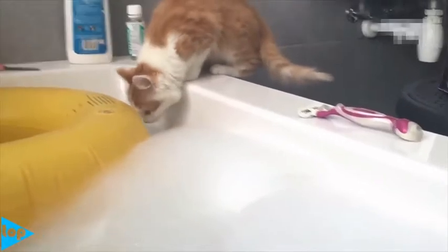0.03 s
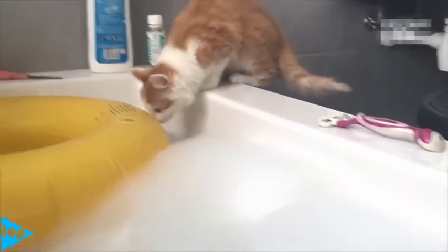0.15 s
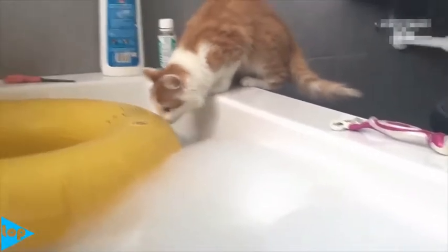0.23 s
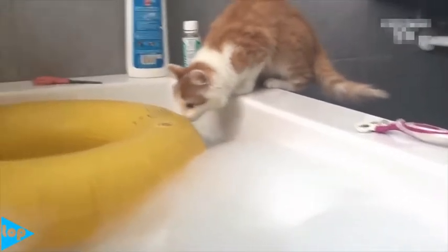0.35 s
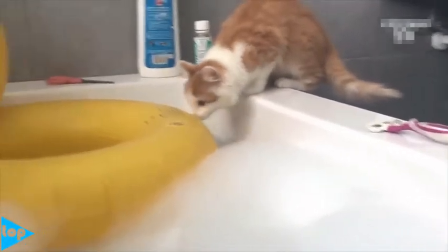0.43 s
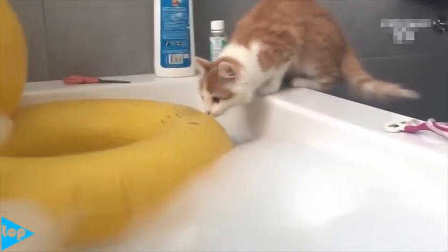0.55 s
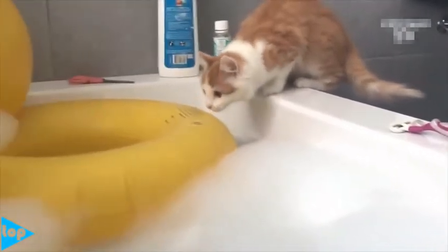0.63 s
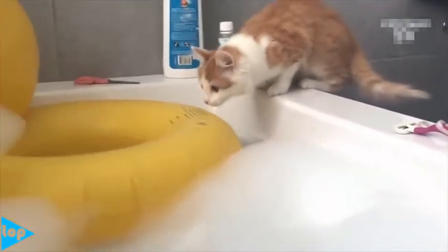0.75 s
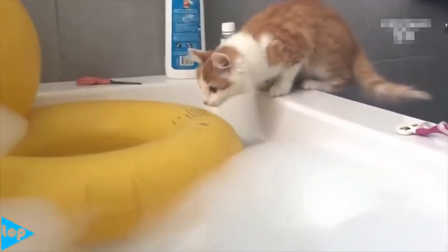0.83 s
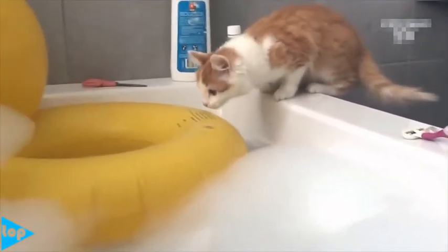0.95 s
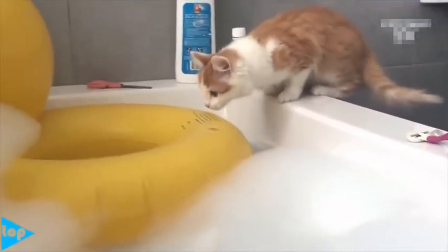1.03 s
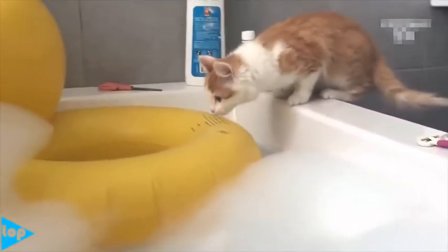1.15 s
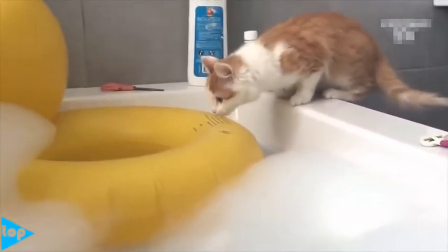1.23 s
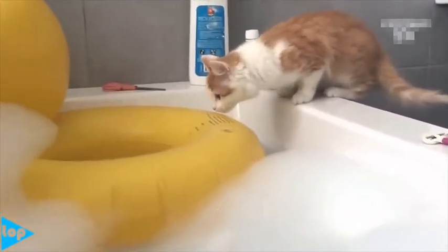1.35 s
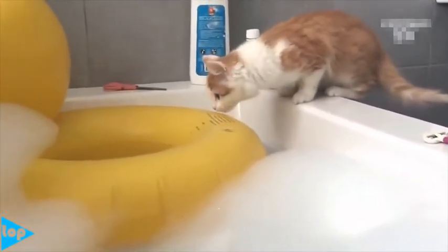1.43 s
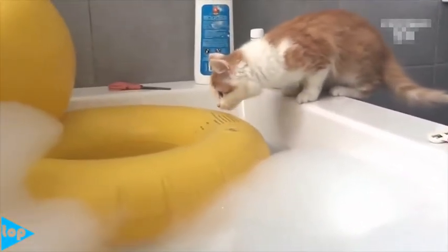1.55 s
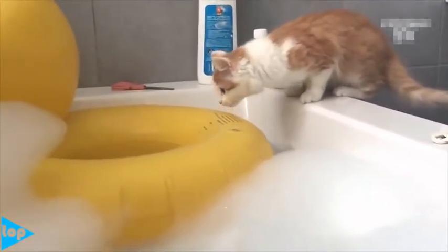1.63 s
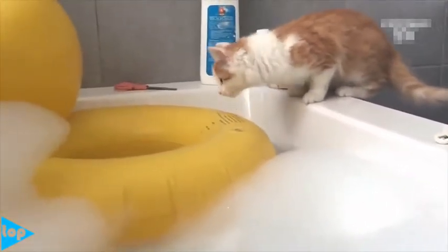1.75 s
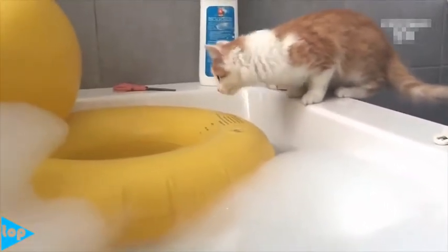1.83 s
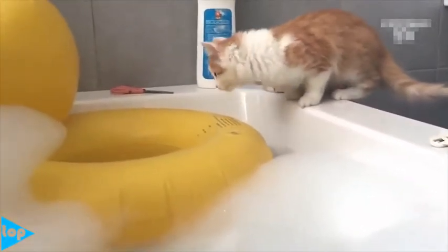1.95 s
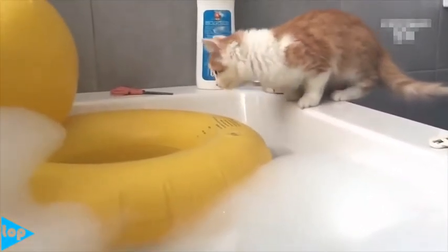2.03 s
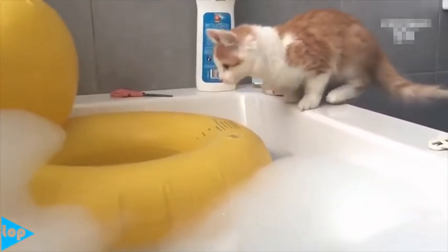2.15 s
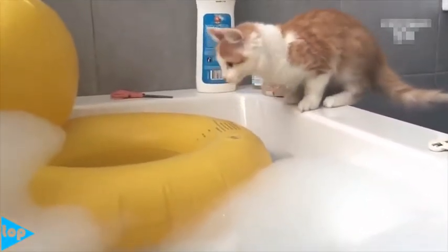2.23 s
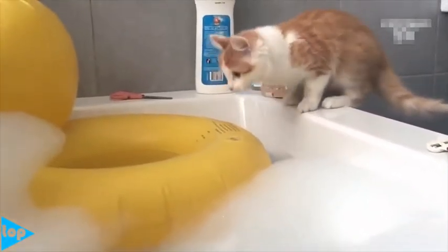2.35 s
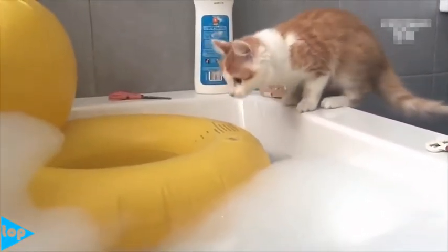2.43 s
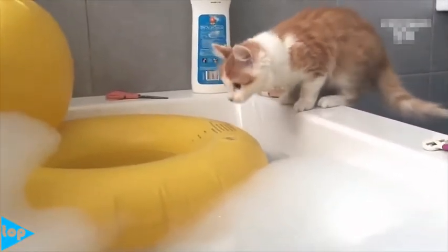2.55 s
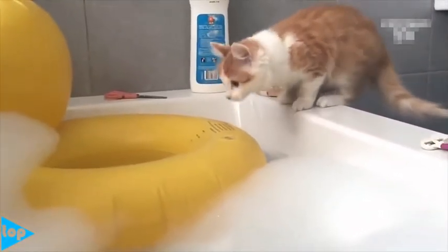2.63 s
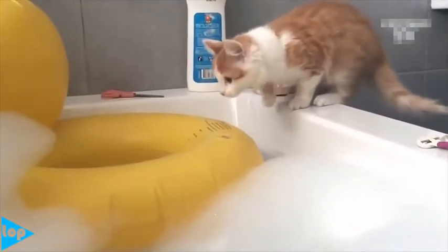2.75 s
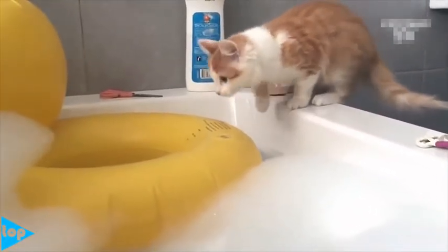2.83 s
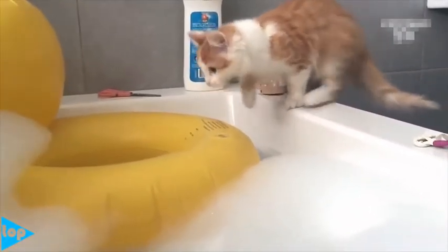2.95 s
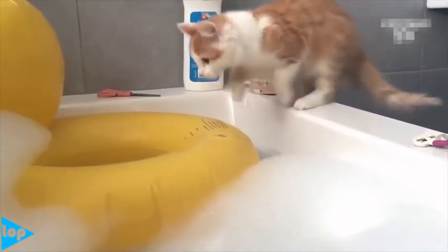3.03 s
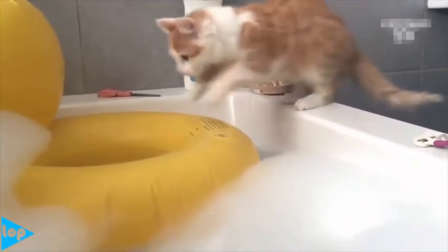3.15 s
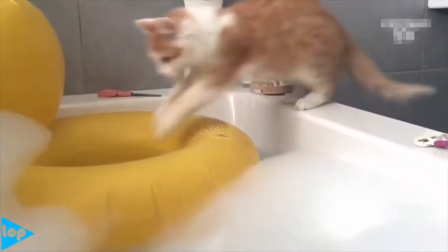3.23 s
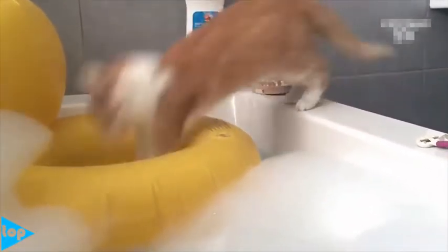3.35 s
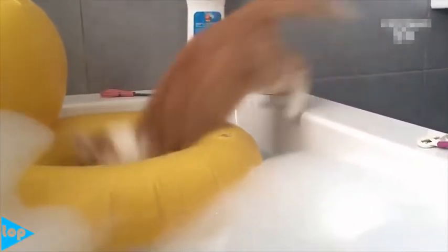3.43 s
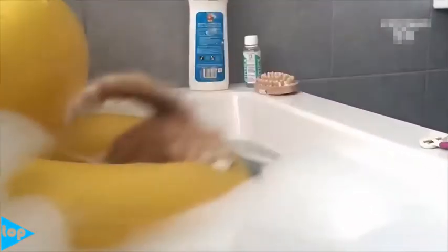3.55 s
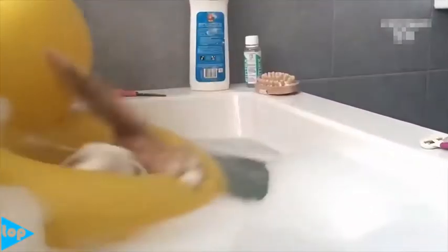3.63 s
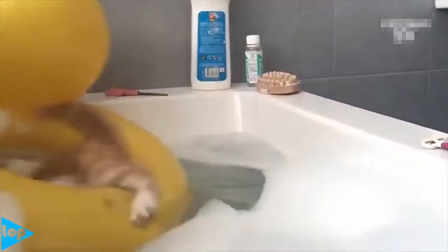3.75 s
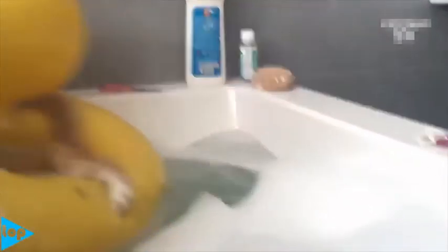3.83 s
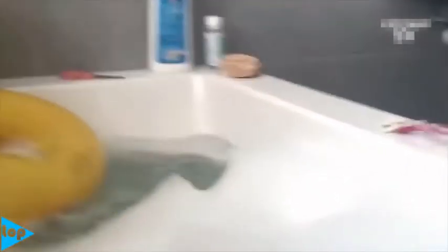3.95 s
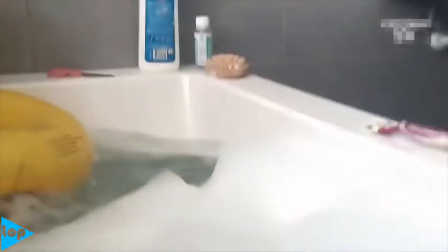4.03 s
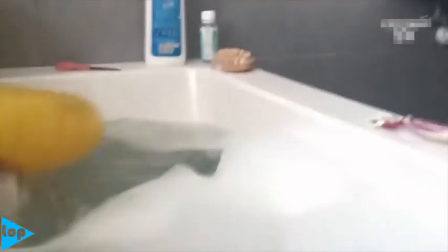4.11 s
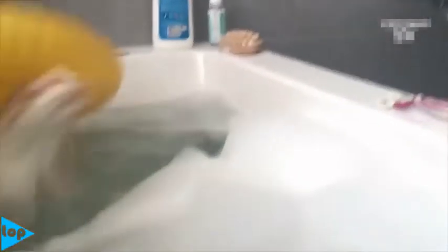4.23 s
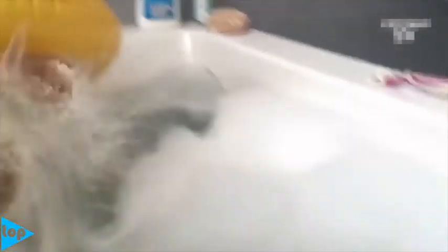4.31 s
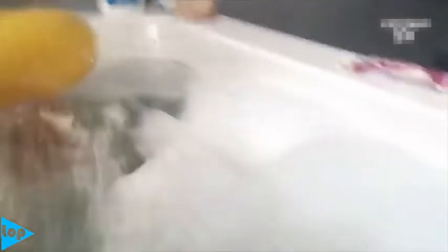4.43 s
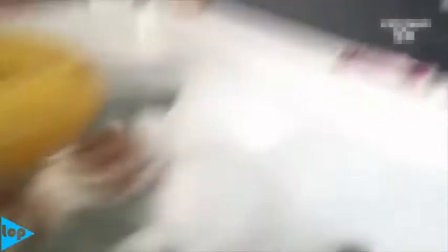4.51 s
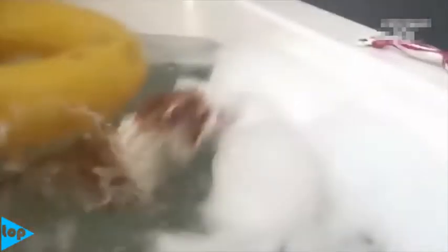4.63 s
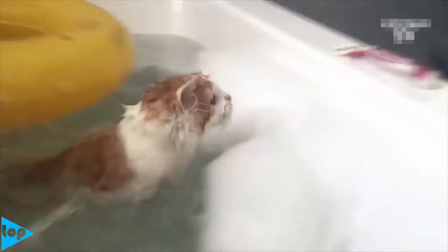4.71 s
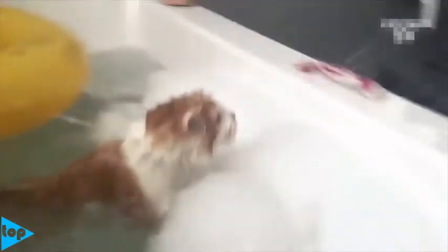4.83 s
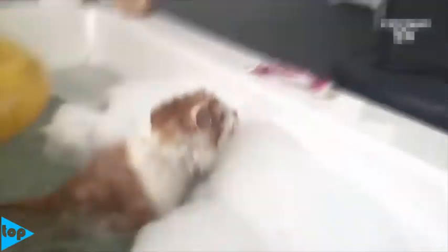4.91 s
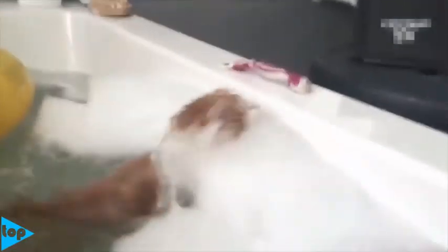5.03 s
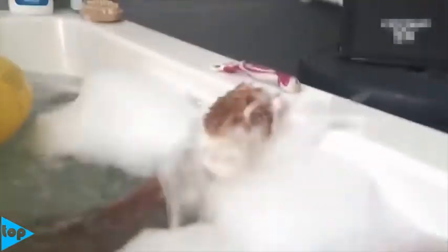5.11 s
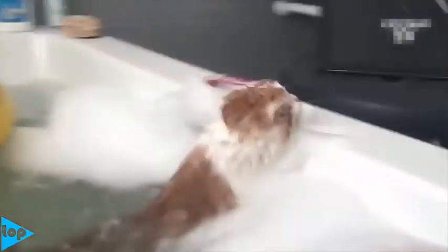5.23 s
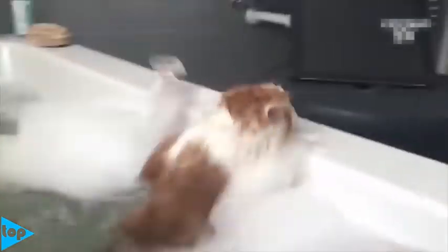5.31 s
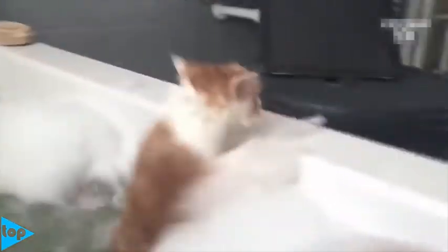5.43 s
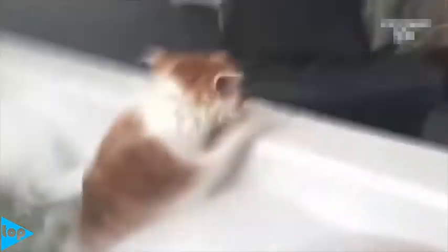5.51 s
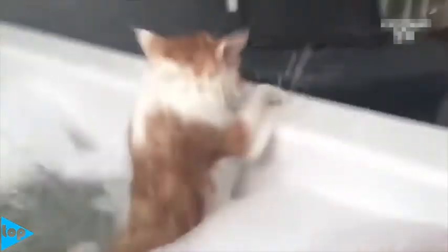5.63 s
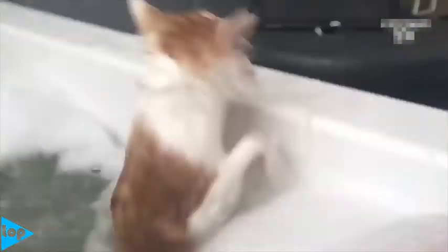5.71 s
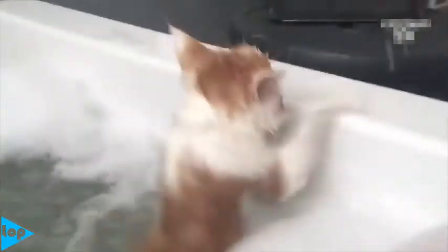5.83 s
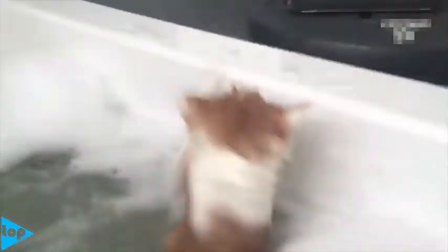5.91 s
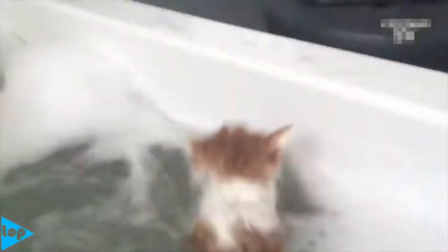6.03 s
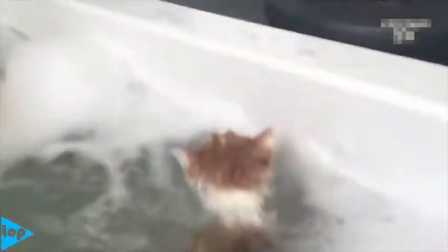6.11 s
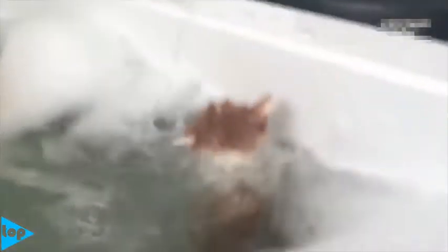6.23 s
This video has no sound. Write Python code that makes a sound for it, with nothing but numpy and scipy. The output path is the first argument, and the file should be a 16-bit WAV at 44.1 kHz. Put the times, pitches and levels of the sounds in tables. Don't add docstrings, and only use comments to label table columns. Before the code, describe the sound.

For the first 3.5 seconds a small tiled bathroom is almost still: a low, slightly wavering extractor fan hum around 100 to 200 Hz, faint air hiss, barely audible foam bubbles and a rare tiny tick near 0.1, 1.5, 2.1 and 2.7. At about 3.6 a cat slips into the bath; the loudest slap lands at 3.68, deep and wet with a short tub boom, followed by another at 3.8. A brief lull with sloshing and a low plop at 4.2 leads to rapid paddling from 4.4 to 4.65, with hollow plops and bright spray. More slaps come around 4.85, a heavy one at 5.09, then 5.26 and 5.4. A crisp spatter hits at 5.6. Splashes shrink, with small plops near 5.97 and 6.16, while water trickles and settles over the hum. Close single microphone, short tiled reverberation.

```python
import sys
import numpy as np
from scipy import signal
from scipy.fft import rfft, irfft, next_fast_len
from scipy.io import wavfile
from scipy.ndimage import uniform_filter1d, map_coordinates

SR = 44100
rng = np.random.default_rng(int(sys.argv[2]) if len(sys.argv) > 2 else 0)


def materialize(psi):
    bounded = np.clip(np.atleast_2d(psi).T, -1, 1)
    quanta = np.round(bounded * 32767).astype(np.int16)
    wavfile.write(sys.argv[1], SR, quanta)


def elevation(decibels):
    levels = np.asarray(decibels, float)
    return 10 ** (levels / 20)


N = 276507
FALL_S = 3.55


def unit(x):
    return x / np.sqrt(np.mean(x ** 2) + 1e-20)


def along(points, hz):
    point_hz, value = np.transpose(points)
    return np.interp(np.log(hz + 1), np.log(point_hz + 1), value)


def wobble(rate):
    knots = rng.standard_normal(int(N * rate / SR) + 4)
    return map_coordinates(knots, [np.arange(N) * rate / SR])


def filtered(x, response):
    m = next_fast_len(N + SR // 2)
    return irfft(rfft(x, m) * response(np.fft.rfftfreq(m, 1 / SR)), m)[..., :N]


def resonances(modes):
    def response(f):
        total = 0
        for k, (hz, width, db) in enumerate(modes):
            total = total + (-1) ** k * elevation(db) * 1j * f * width / (hz * hz - f * f + 1j * f * width)
        return total
    return response


def band(low_hz, high_hz):
    noise = rng.standard_normal(N)
    return unit(filtered(noise, lambda f: 1 / (1 + (low_hz / (f + 1)) ** 8) / (1 + (f / high_hz) ** 8)))


def rush(spectrum, patchy_db):
    z = signal.stft(rng.standard_normal(N + 512), nperseg=256)[2]
    field = uniform_filter1d(uniform_filter1d(rng.standard_normal(z.shape), 5, 0), 8, 1)
    patched = signal.istft(z * elevation(patchy_db * unit(field)), nperseg=256)[1][:N]
    return unit(filtered(patched, lambda hz: elevation(along(spectrum, hz))))


def bubbles(count, centre_hz, spread, cycles, scatter_db, since=FALL_S):
    when, pitch = rng.random(count), rng.standard_normal(count)
    loudness = np.minimum(rng.exponential(size=count), 3)
    hz = np.clip(centre_hz * np.exp(spread * pitch), 150, 14000)[:, None]
    t = np.arange(int(4 * cycles / centre_hz * SR)) / SR
    age = t * hz / cycles
    ring = np.sin(2 * np.pi * hz * t * (1 + 0.094 * age / cycles ** .5))
    grain = elevation(scatter_db * loudness)[:, None] * ring * np.exp(-age) * (1 - np.exp(-6 * age))
    start = int(since * SR)
    at = (start + when * (N - start)).astype(int)[:, None] + np.arange(len(t))
    out = np.bincount(at.ravel(), grain.ravel(), N + len(t))[:N]
    return out / np.sqrt(np.mean(out[start:] ** 2))


# hz, t60_s
TILE_DECAY = [(200, 0.35), (1500, 0.27), (6000, 0.25), (15000, 0.46)]


def tiles(x):
    hz, t, z = signal.stft(rng.standard_normal(SR // 2), SR, nperseg=256)
    tail = signal.istft(z * elevation(-60 * t / along(TILE_DECAY, hz)[:, None]), SR, nperseg=256)[1]
    return signal.fftconvolve(np.pad(x, (200, 0)), tail / np.linalg.norm(tail))[:N]


def far(x, share):
    return np.sqrt(1 - share) * x + np.sqrt(share) * tiles(x)


# start_s, level_db, pitch_hz, life_cycles, boom_db
THUMPS = [(3.589, -31.5, 383, 1.3, -5), (3.652, -24, 270, 2.7, -7), (3.676, -3, 376, 1.2, -12.5),
          (3.697, -15, 267, 1.9, 0.5), (3.798, -12, 247, 0.85, -3), (3.863, -17.5, 260, 1.4, -14.5),
          (4.171, -11, 190, 1.3, -16.5), (4.502, -18, 674, 1.9, -10.5), (4.636, -13, 970, 0.43, -1.5),
          (4.839, -22, 258, 2.1, -5), (5.09, -4, 455, 0.99, -4.5), (5.212, -20, 500, 1, -14),
          (5.256, -8, 405, 0.96, -13.5), (5.272, -20, 248, 2, 1), (5.39, -15.5, 347, 2.2, -13.5)]
# start_s, level_db, pitch_hz, life_cycles
PLOPS = [(3.631, -34, 1500, 1.2), (4.3, -23.5, 378, 2.4), (4.433, -10.5, 850, 1.7), (4.539, -8, 2100, 1.4),
         (4.623, -4.5, 756, 2.4), (4.868, -11.5, 730, 1.3), (4.929, -12.5, 816, 2.4),
         (4.974, -18.5, 1980, 2.1), (5.155, -24, 323, 2.1), (5.419, -16, 524, 1.4), (5.447, -20, 1010, 2.5),
         (5.474, -25, 1130, 4.2), (5.555, -19.5, 980, 1.5), (5.805, -35, 3100, 6), (5.855, -33, 970, 2.5),
         (5.949, -23.5, 480, 2.8), (5.97, -15.5, 1930, 0.89), (6.155, -14.5, 1070, 0.34)]
# pitch_hz, level_db, t60_s
TUB_MODES = [(187.8, 1, 0.25), (323, -16.5, 0.17), (463, -11, 0.08)]
# pitch_hz, t60_s
DEEP_MODE = (100, .3)
# start_s, level_db
PLUNGE = (3.668, -14)


def slaps():
    pockets, booms = np.zeros((2, N + SR))
    t = np.arange(SR // 3) / SR
    swell = (1 - np.exp(-t / 0.0043)) ** 2

    def mode(hz, t60, start):
        return elevation(-60 * t / t60) * np.sin(2 * np.pi * hz * (start + t))

    plop_boom_db = -20.5
    for start, db, hz, cycles, boom_db in THUMPS + [(*row, plop_boom_db) for row in PLOPS]:
        age = t * hz / cycles
        turns = 0.947 * hz * t + 0.17 * (1 - np.exp(-hz * t))
        pocket = -np.sin(2 * np.pi * turns) * np.exp(-age) * (1 - np.exp(-2.5 * age))
        crack = np.sin(2 * np.pi * 4.42 * hz * t) * np.exp(-2.2 * age) * (1 - np.exp(-6 * age))
        shell = sum(elevation(level + rng.normal(0, 1.0)) * mode(f, t60, start) for f, level, t60 in TUB_MODES)
        body = shell + elevation(-16.5) * mode(*DEEP_MODE, start)
        i = round(start * SR)
        pockets[i:i + len(t)] += elevation(db + 7.5) * (pocket + elevation(-15) * crack)
        booms[i:i + len(t)] += swell * elevation(db + boom_db + 1) * body
    start, db = PLUNGE
    booms[round(start * SR):][:len(t)] += swell * elevation(db) * mode(*DEEP_MODE, start)
    plops = filtered(pockets[:N], lambda f: 1j * f / (90 + 1j * f))
    return far(plops, share=0.25) + booms[:N] * elevation(1.1 * wobble(45))


# start_s, level_db, centre_hz, surge_db
WASHES = [(0.0698, -46.5, 2430, -14), (3.6311, -23, 1000, 0), (3.6546, -18.5, 1030, 3),
          (3.676, -9, 1350, 6.5), (3.803, -10.5, 1160, 0.5), (3.8632, -30, 1140, 15.5),
          (4.1777, -17, 900, 2), (4.2327, -20.5, 1310, 0), (4.381, -13.5, 2150, -26),
          (4.4352, -8, 1010, -14), (4.5016, -9.5, 1360, -3), (4.541, -18, 2060, -28),
          (4.6158, -5.5, 1440, -3.5), (4.6263, -7, 950, -6), (4.79, -15.5, 750, -5),
          (4.8682, -7.5, 1490, -4), (4.9272, -13.5, 850, -8), (5.0886, -8, 1090, -6),
          (5.2547, -12.5, 1450, 1), (5.2844, -16.5, 1040, -12), (5.3892, -20, 915, 8),
          (5.441, -17, 920, -24), (5.5538, -17.5, 980, -16), (5.5907, -35, 3700, -23),
          (5.6288, -23.5, 1580, -17), (5.7773, -34, 2530, -20), (5.9533, -17, 960, -8),
          (5.9702, -16.5, 1760, -8), (6.155, -22, 1000, -24), (6.1856, -27.5, 1470, -31)]
# hz, level_db per Hz
SURGE = [(76, -43), (130, 0), (187, 2), (227, 0.5), (722, -4.5), (1300, -24), (1690, -33), (2860, -120)]


def washes():
    out, t = np.zeros(N + SR), np.arange(16384) / SR
    f = np.fft.rfftfreq(len(t), 1 / SR) + 1
    lumps = np.pad(elevation(2.2 * wobble(120)), (0, SR))
    for start, db, hz, surge_db in WASHES:
        i = round(start * SR)
        noise = rfft(rng.standard_normal((2, len(t))) * lumps[i:i + len(t)])
        swarm = unit(irfft(noise[0] / (1 + (np.log(f / hz) / 0.58) ** 2) ** 2, len(t)))
        surge = unit(irfft(noise[1] * elevation(along(SURGE, f)), len(t)))
        shape = elevation(db - 11 - 60 * t / 0.17) * (1 - np.exp(-t / 0.002))
        out[i:i + len(t)] += shape * (swarm + elevation(surge_db + 0.5) * surge)
    return out[:N]


# start_s (fullest churn), level_db, froth_db (more spray), depth_db (more surge)
STROKES = [(3.699, -34, -5, -13), (3.86, -34.5, -7.5, 1), (3.97, -42, 5, 0), (4.1, -38, 3, 7),
           (4.29, -32, -4.5, 4), (4.449, -28.5, 4.5, -3), (4.57, -34.5, 10, -10), (4.76, -28.5, -9.5, -2.5),
           (4.96, -37.5, 0, 5.5), (5.2, -37.5, -6, 9), (5.499, -38.5, 7, 3.5), (5.63, -42, 7.5, -15),
           (5.82, -58.5, 15, -8), (6.03, -45.5, 4.5, 3), (6.2, -46.5, 6, -1)]
# surge_db, splash_db, spray_db
LAYER_DB = (-5.5, -0.68, -10)
SETTLE_DB_PER_S = (42, 51, 57.5)


def churn():
    t = np.arange(0, N, 32) / SR
    power, stir_s = np.zeros((3, len(t))), 0.13
    for start, db, froth_db, depth_db in STROKES:
        rise = np.cos(np.pi / 2 * np.clip((start - t) / stir_s, 0, 1)) ** 2
        layer_db = db + np.add(LAYER_DB, [depth_db, 0, froth_db])[:, None]
        settling_db = np.outer(SETTLE_DB_PER_S, np.maximum(t - start, 0))
        power += (rise * elevation(layer_db - settling_db)) ** 2
    return [np.interp(np.arange(N) / SR, t, gain) for gain in np.sqrt(power)]


# hz, level_db per Hz
SPLASH = [(350, -50), (620, -6), (1100, -2), (2000, -5), (3600, -10), (5500, -30), (9000, -90)]
# hz, level_db per Hz
SPRAY = [(1500, -30), (2700, -3), (4000, -3.5), (5200, -8), (7000, -9), (10000, -12), (14700, -15),
         (16500, -17)]


def slosh():
    low, middle, high = churn()
    flutter = 1.0 * wobble(35)
    surge = 0.43 * rush(SURGE, patchy_db=-2.5)
    surge = surge + 0.67 * bubbles(count=320, centre_hz=491.0, spread=0.39, cycles=2.45, scatter_db=3.5)
    splash = 0.5 * rush(SPLASH, patchy_db=-1.0)
    splash = splash + 0.59 * bubbles(count=1300, centre_hz=1915, spread=0.514, cycles=4.85, scatter_db=2.5)
    splash = splash + 0.37 * bubbles(count=260, centre_hz=2100, spread=0.6, cycles=11.1, scatter_db=2.0)
    spray = 1.03 * rush(SPRAY, patchy_db=-2.5)
    spray = spray + 1.32 * bubbles(count=4000, centre_hz=5026, spread=0.537, cycles=6.0, scatter_db=-7.0)
    return (low * elevation(flutter + 0.32 * wobble(18)) * surge
            + middle * elevation(flutter + 0.76 * wobble(30)) * splash
            + high * elevation(flutter + 1.3 * wobble(60)) * spray)


# start_s, level_db, brightness_db per band, t60_s
DROPS = [(0.0633, -58, 5, .08), (1.5174, -54, -6, 0.054), (2.1244, -57, 0, .08), (2.6853, -56, 0, 0.073),
         (3.5194, -54, -5, 0.089), (3.5783, -57.5, -17, 0.088), (3.603, -56, -7, .09),
         (3.7147, -30, -4, 0.097), (4.1879, -37, 6, .09), (4.3372, -26, -4.5, .06), (4.407, -19, 3, 0.074),
         (4.6852, -19.5, 0, .06), (4.817, -23, 9.5, 0.022), (4.9758, -31.5, 3.5, 0.086),
         (4.9874, -39, 2, .08), (5.158, -33.5, 1, 0.051), (5.3564, -40, -3, 0.11), (5.5306, -26, -4, .084),
         (5.551, -23, -7, 0.073), (5.5909, -8.5, -1, 0.039), (5.6273, -23, -1, 0.057),
         (5.7748, -30.5, -6.5, 0.053), (5.803, -30.5, 1, .095), (5.8554, -26.5, 0, 0.069),
         (5.9374, -43, 4, 0.12), (6.0921, -38, 3, 0.066), (6.126, -27, -3, .033),
         (6.159, -26.5, -11.5, 0.069), (6.186, -35.5, -15.5, 0.042)]
# start_s, level_db, brightness_db per band
BURSTS = [(2.1044, -56.5, 3), (3.648, -33, -3), (3.8026, -28.5, -8.5), (4.446, -22.5, 1),
          (4.5006, -13.5, 0), (4.6165, -21, 4), (4.626, -17.5, -11.5), (4.8768, -23, -5), (5.076, -33, 2),
          (5.0878, -23, -7.5), (5.259, -36, -6), (5.282, -41, -9), (5.4338, -25.5, -2.5),
          (5.9533, -28.5, -3), (5.97, -27, -1.5)]


def drops():
    levels, t = np.zeros((3, N + SR)), np.arange(SR // 3) / SR
    burst_t60_s, middle_db = 0.13, 1
    for start, db, bright_db, t60 in DROPS + [(*row, burst_t60_s) for row in BURSTS]:
        tick = elevation(-60 * t / .011) * (1 - np.exp(-t / .003)) ** 2
        hiss = elevation(-60 * t / t60) * (1 - np.exp(-t / 0.0065))
        puff = elevation(db + 11.5) * (tick + 0.78 * t60 * hiss)
        i = round(start * SR)
        levels[:, i:i + len(t)] += elevation([-bright_db, middle_db, bright_db])[:, None] * puff
    dull, middle, bright = levels[:, :N]
    return dull * band(2000, 5000) + middle * band(5000, 9000) + bright * band(9000, 16500)


def foam():
    burst = bubbles(count=70, centre_hz=1250, spread=0.38, cycles=26.6, scatter_db=3.5, since=0)
    return elevation(-69.5) * far(burst, share=0.31)


# pitch_hz, width_hz, level_db
LOW_MODES = [(48.7, 13.6, -15), (79.4, 18, -7), (102.1, 9.6, 1)]
# pitch_hz, width_hz, level_db
UPPER_MODES = [(142.4, 6.1, 0.5), (192.8, 6.9, 2.5), (254.5, 5.7, -8.5), (271.3, 8.7, -20),
               (304.4, 3.9, -13), (346, 50, -20), (384.3, 6.8, -17), (442.3, 21.3, -17.5),
               (573, 18.6, -21.5), (630, 17.5, -25), (840, 38, -34), (885, 36, -30), (1060, 15, -27.5),
               (1130, 43, -36.5), (1380, 8.6, -41)]
# hz, level_db per Hz
DRAUGHT = [(18, -47), (30, -12), (75, -10.5), (102, -6), (143, -19.5), (201, -24), (282, -16.5), (555, -40),
           (759, -36.5), (1700, -31.5), (2520, -41), (13000, -58.5), (15200, -60)]


def fan():
    drift_db = 1.2 * wobble(2.55)
    low = filtered(rng.standard_normal(N), lambda f: resonances(LOW_MODES)(f) / (1 + (f / 125) ** 6))
    upper = filtered(rng.standard_normal(N),
                     lambda f: resonances(UPPER_MODES)(f) / (1 + (120 / (f + 1)) ** 6))
    draught_db = -48.5 - 1.16 * np.abs(np.arange(N) / SR - FALL_S) + 0.09 * wobble(2.85)
    draught = elevation(draught_db) * rush(DRAUGHT, patchy_db=2.5)
    return elevation(drift_db - 37.5) * unit(low) + elevation(drift_db - 43.5) * unit(upper) + far(draught, share=0.34)


# start_s (centre), low_hz, high_hz, level_db
SIDE_HISSES = [
    (3.9, 5600, 7660, -56),
    (3.95, 4160, 5800, -56),
    (4.575, 4250, 5300, -46),
    (4.575, 6800, 8500, -47),
    (4.575, 12700, 13700, -48),
    (4.6, 10500, 11400, -44),
    (4.625, 13400, 14400, -43),
]


def side_hiss():
    side, t = np.zeros(N), np.arange(N) / SR
    hiss = rng.standard_normal(N)
    for start, low_hz, high_hz, db in SIDE_HISSES:
        frame = np.cos(np.pi / 2 * np.clip((t - start) / 0.024, -1, 1))
        side += elevation(db) * frame * unit(filtered(hiss, lambda f: (f > low_hz) * (f < high_hz)))
    return np.array([side, -side])


def scene():
    water = slaps() + far(washes() + drops(), share=0.21) + far(slosh(), share=0.3)
    return np.tile(water + foam() + fan(), (2, 1))


def roll_off(x):
    return signal.sosfilt(signal.butter(12, 16630, fs=SR, output="sos"), x)


def record(dry):
    mix = filtered(dry + side_hiss(), lambda hz: 1 / (1 + (hz / 15350) ** 90))
    return roll_off(mix)


dry = scene()
out = record(dry)
materialize(out)
```